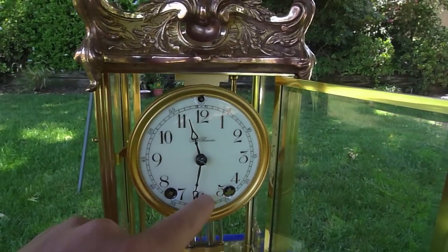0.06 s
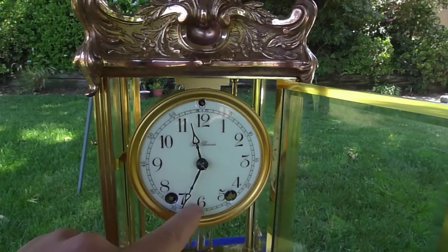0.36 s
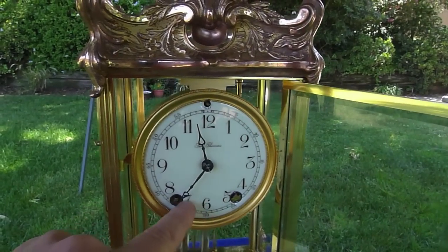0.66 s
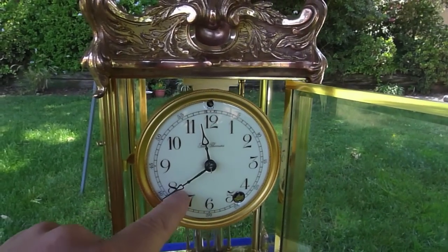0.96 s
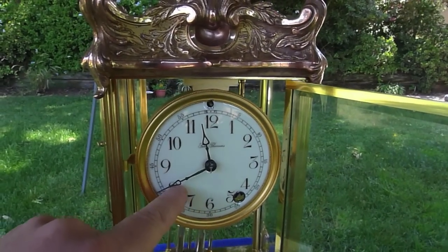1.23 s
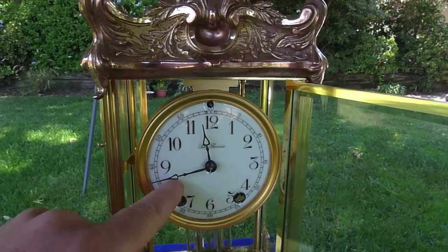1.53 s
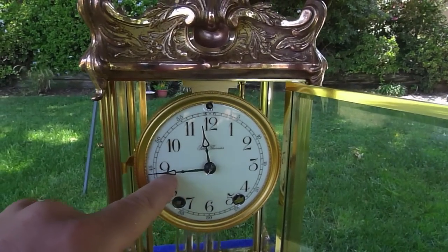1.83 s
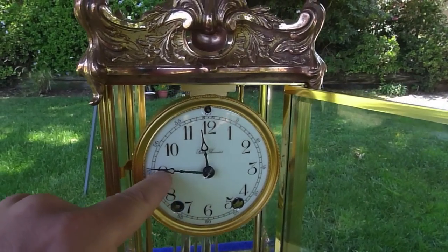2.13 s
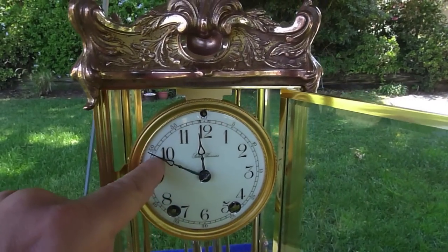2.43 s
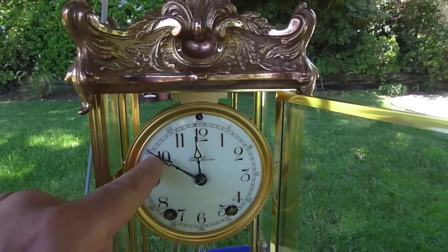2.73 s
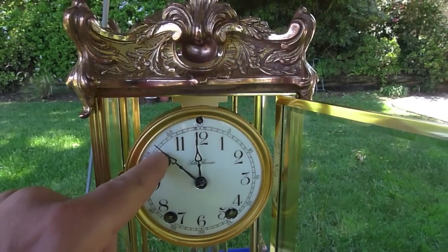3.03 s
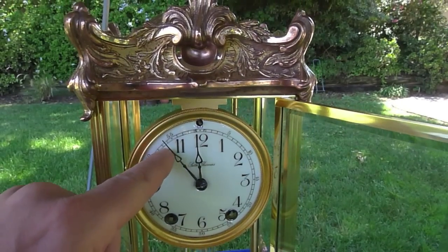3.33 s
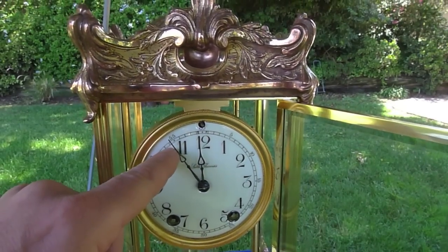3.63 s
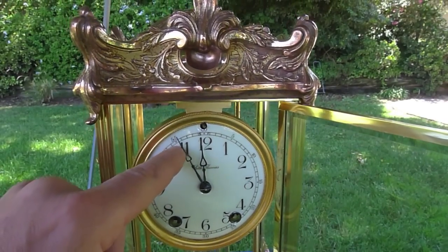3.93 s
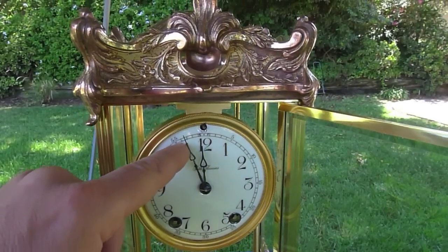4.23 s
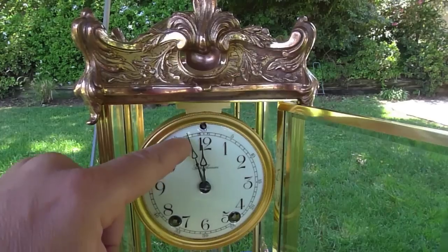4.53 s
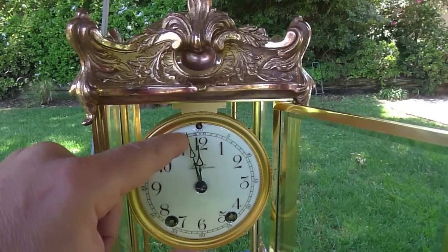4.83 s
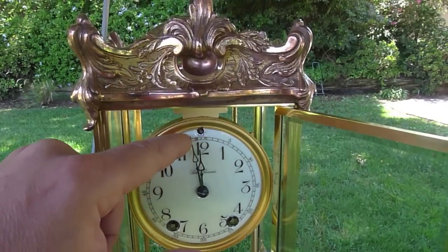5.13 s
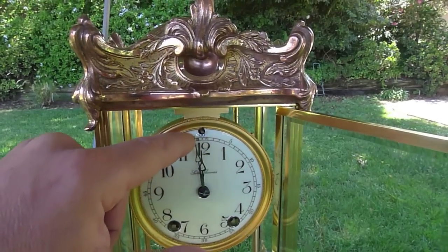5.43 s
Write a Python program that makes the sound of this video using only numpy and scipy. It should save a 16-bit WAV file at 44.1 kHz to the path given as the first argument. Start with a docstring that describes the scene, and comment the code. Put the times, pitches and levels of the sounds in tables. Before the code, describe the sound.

A brass mantel clock ticks close by throughout, a little under three beats a second, crisp ticks alternating with softer tocks and slowly growing duller. Behind it lies a soft, steady garden wash of distant traffic and leaves, swelling slightly near 1.7 seconds, dotted with faint, quick pips. At about 0.7 seconds there is a tiny click, then the minute hand pings lightly under a finger. At 2.7 seconds the strike mechanism releases with a click, whirrs very briefly and is caught with another click at 2.8. At 3.1 seconds a lever snaps down, by far the loudest sound, and the brass plates ring briefly. The ticking continues until the end, around 5.5 seconds. Small birds call quietly: very faint high peeps near 0.6 and 3.2 seconds, a chip at 1.6, single chirps at 2.4 and 3.9, and three thin notes around 4.2.

```python
"""A brass mantel clock ticks in a garden: each impact of its escapement excites damped metal modes.
A finger pushes the minute hand toward the hour, and the hand pings once. The strike train is let go,
whirrs for a moment and is caught; then a lever snaps down loudly and the brass plates ring.
Behind it are a broadband wash of far traffic and foliage, soft low pips, and a few small birds
whose whistles are scattered by leaves and walls."""
import sys
import numpy as np
from scipy import signal
from scipy.fft import rfft, irfft
from scipy.io import wavfile

SR = 44100
rng = np.random.default_rng(int(sys.argv[2]) if len(sys.argv) > 2 else 0)


def digitize_waveform(pressure):
    """Quantize a signal to 16-bit integers and store it at the path in sys.argv[1].

    Rows of a 2-D input are taken as channels; values are limited to [-1, 1].
    """
    field = np.atleast_2d(pressure).T
    bounded = np.clip(field, -1, 1)
    quanta = np.round(bounded * 32767).astype(np.int16)
    wavfile.write(sys.argv[1], SR, quanta)


N = 245637


def amp(db):
    """Amplitude ratio of a level in decibels."""
    return 10 ** (np.asarray(db) / 20)


def unit_rms(x):
    """Normalisation to rms 1."""
    return x / np.sqrt(np.mean(x ** 2) + 1e-20)


def add(mix, start_s, sound):
    """Superposition: a sound joins the mix at its start time."""
    part = mix[max(round(start_s * SR), 0):][:len(sound)]
    part += sound[:len(part)]


def colour(x, spectrum):
    """Linear filtering by (f/Hz, gain/dB) points, interpolated in log frequency."""
    f, db = np.transpose(spectrum)
    hz = np.fft.rfftfreq(x.shape[-1], 1 / SR)
    gain = amp(np.interp(np.log(hz + 1), np.log(f), db))
    return irfft(rfft(x) * gain, x.shape[-1])


def noise(spectrum, size):
    """Spectral shaping of white noise, at rms 1."""
    return unit_rms(colour(rng.standard_normal(size), spectrum))


def decay(t, t60):
    """Exponential damping: 60 dB in t60 seconds."""
    return np.exp(-np.log(1000) * t / t60)


def ring(modes, t):
    """Free vibration: a sum of damped modes in random phase."""
    return sum(amp(db) * decay(t, t60) * np.sin(2 * np.pi * (hz * t + rng.random()))
               for hz, db, t60 in modes)


def impact(modes, spectrum, rattle_share, rattle_t60, rise_s):
    """Impact excitation: distinct modes plus a dense, noisy rattle; rms 1 over the first 10 ms."""
    t = np.arange(SR // 3) / SR
    head = SR // 100
    clear = ring(modes, t)
    rattle = noise(spectrum, len(t)) * decay(t, rattle_t60)
    sound = np.sqrt(1 - rattle_share) * clear / clear[:head].std()
    sound += np.sqrt(rattle_share) * rattle / rattle[:head].std()
    sound *= 1 - np.exp(-t / rise_s)
    return sound / sound[:head].std()


# Spectrum of the outdoor noise: f/Hz, relative level/dB
WASH_SPECTRUM = [(15, -69.5), (25, -49), (49, -37.5), (105, -21), (158, -14.5), (186, -13.5), (237, -10.5),
                 (431, -6), (497, -6.5), (995, -7.5), (1120, -7.5), (1260, -9), (5310, -18), (6580, -23.5),
                 (7600, -39.5), (9880, -67), (16700, -120)]


def wash(level_db=-54, swell_db=3.5, swell_at_s=1.66, swell_width_s=0.39):
    """Incoherent sources, far traffic and foliage, sum to steady noise; its low band swells once."""
    air = amp(level_db) * noise(WASH_SPECTRUM, N)
    low = signal.sosfiltfilt(signal.butter(1, (300, 400), "band", fs=SR, output="sos"), air)
    swell = np.exp(-((np.arange(N) / SR - swell_at_s) / swell_width_s) ** 2)
    return air + low * (amp(swell_db * swell) - 1)


# Ticks and tocks in turn, uneven from tooth to tooth: t/s, relative level/dB
BEATS = [(0.0892, -41), (0.4767, -44.5), (0.826, -39), (1.2004, -42), (1.5609, -39.5), (1.9364, -41.5),
         (2.307, -39.5), (2.679, -44.5), (3.046, -37.5), (3.4166, -44), (3.7854, -38.5), (4.166, -46.5),
         (4.5305, -38.5), (4.897, -42), (5.2677, -38.5)]
# Modes of the escapement: f/Hz, tick level/dB, tock level/dB, T60/s
ESCAPEMENT_MODES = [(1350, -21, -12, 0.058), (2025, -2, -25, 0.13), (2418, -5, -13, 0.071),
                    (3080, -5.5, -6, 0.02), (3337, -6, -1.5, 0.063), (3494, 1, 1, 0.065),
                    (4140, -3.5, -3.5, .06), (4600, -11, -10, 0.12), (5330, -11.5, -11, 0.099),
                    (5930, -6.5, -5, 0.093), (5840, -17, -5, 0.088), (6310, -0.5, -4, 0.068),
                    (6530, -7, -10.5, 0.041)]
# Spectrum of a beat's rattle: f/Hz, level/dB
BEAT_RATTLE = [(600, -24.5), (1200, 1), (2000, -3.5), (3200, 4.5), (4500, -3), (6300, 2.5), (7200, -17)]


def escapement():
    """Modal ringing: teeth drop on two pallets in turn, a crisp tick and a softer tock, no two alike."""
    out = np.zeros(N)
    for k, (s, db) in enumerate(BEATS):
        is_tock = k % 2
        tilt = 5 - 1.5 * s  # dB/octave: the beats start bright and slowly grow duller
        modes = []
        for hz, tick_db, tock_db, t60 in ESCAPEMENT_MODES:
            level = (tock_db if is_tock else tick_db) + tilt * np.log2(hz / 3000)
            modes.append((hz, level + 0.73 * rng.standard_normal(), t60))
        if is_tock:
            beat = amp(-6.5) * impact(modes, BEAT_RATTLE, 0.25, rattle_t60=0.11, rise_s=0.0012)
        else:
            beat = amp(-7.5) * impact(modes, BEAT_RATTLE, 0.4, rattle_t60=0.098, rise_s=0.00046)
        add(out, s - 0.0005, amp(db) * beat)
    return out


# The clearest pips from the garden: t/s, relative level/dB
CLEAR_PIPS = [(0.1922, -50), (0.2485, -50), (0.8344, -50), (1.4017, -52), (1.7327, -52), (1.932, -50.5),
              (2.3967, -52), (2.8898, -49.5), (3.4903, -46.5), (3.6532, -47.5), (3.714, -49),
              (3.843, -49.5), (4.1046, -49), (4.2856, -47.5), (4.3894, -51), (4.8996, -49), (5.1826, -46.5),
              (5.448, -52)]


def pips(pitch_hz=1135.5, rise_s=0.007, width_s=0.0082, gap_s=0.075, growth_db_per_s=0.86):
    """Gaussian tone pulses near one pitch: a few clear ones in a faint, uneven, slowly growing chatter."""
    out = np.zeros(N)
    t = np.arange(-SR // 50, SR // 50) / SR
    clear = [(s + rise_s, db) for s, db in CLEAR_PIPS]
    jitter, spread = rng.standard_normal(size=(120, 2)).T
    times = gap_s * (np.arange(len(jitter)) + 0.3 * jitter)
    levels = -58.5 + growth_db_per_s * times + 3.5 * np.minimum(spread, 1.5)
    faint = [(s, db) for s, db in zip(times, levels)
             if all(abs(s - clear_s) > t[-1] for clear_s, _ in clear)]
    envelope = np.exp(-(t / width_s) ** 2)
    for s, db in clear + faint:
        hz = pitch_hz * (1 + 0.015 * rng.standard_normal())
        add(out, s + t[0], amp(db - 0.5) * envelope * np.sin(2 * np.pi * hz * t))
    return out


def progress(length_s):
    """Normalised time, 0 to 1 over a note."""
    return np.linspace(0, 1, round(length_s * SR))


def whistle(hz, db, hoarse=0, harmonics=((1, 0),), flutter_hz=540):
    """Amplitude modulation: random flutter spreads a bird's pure tone into a hoarse band."""
    lowpass = signal.butter(3, flutter_hz, fs=SR, output="sos")
    flutter = unit_rms(signal.sosfilt(lowpass, rng.standard_normal(len(hz))))
    cycles = np.cumsum(hz) / SR
    tone = sum(amp(level) * np.sin(2 * np.pi * k * cycles) for k, level in harmonics)
    voice = tone * (np.sqrt(1 - hoarse) + np.sqrt(hoarse) * flutter)
    return amp(db) * voice * signal.windows.tukey(len(hz), 0.15)


# Runs of very high peeps: t/s, level/dB
PEEP_RUNS = [(0.618, -72), (3.186, -73.5)]


def peeps(from_hz=6720, to_hz=7300, length_s=0.028, period_s=0.068):
    """Linear frequency sweeps: a bird's rising peeps, three to a run."""
    out = np.zeros(N)
    hz = from_hz + (to_hz - from_hz) * progress(length_s)
    for s, db in PEEP_RUNS:
        for k in range(3):
            add(out, s + k * period_s, whistle(hz, db))
    return out


# Blows in the strike work: t/s, relative level/dB, tilt/(dB/octave), rattle share of the power
BLOWS = [(0.689, -50, 17, 0.9), (2.676, -41, 6, 0.9), (2.6875, -30.5, -4, 0.57), (2.8117, -46, 13, 0.7),
         (2.8272, -31.5, -1.5, 0.87), (3.0775, -17, 1, 0.31), (3.091, -29.5, -1, 0.8)]
# Modes of the brass plates and levers: f/Hz, level/dB, T60/s
PLATE_MODES = [(707, -17.5, 0.24), (1240, -13, 0.13), (1297, -10, 0.17), (1450, -16.5, .18),
               (1618, -11.5, 0.23), (1900, 3, 0.029), (2010, -4, 0.16), (2094, 9, 0.069), (2503, 1, 0.08),
               (2770, -11, 0.15), (3122, -12.5, 0.17), (3300, -9, .11), (3530, -10, 0.2), (3380, -4, 0.073),
               (3920, -2, .1), (3840, -6, .1), (4030, -9, 0.19), (4140, -1.5, 0.11), (4345, -11.5, .11),
               (4870, -4, 0.12), (4990, -8.5, 0.15), (5300, -10.5, .11), (5720, -16, 0.13),
               (5670, -16.5, 0.088), (5750, -11, 0.13), (6300, -11, .07), (6720, -13.5, 0.11),
               (7200, -17, .08)]
# Spectrum of a blow's rattle: f/Hz, level/dB
BLOW_RATTLE = [(180, -65), (300, -32.5), (1240, -13.5), (1480, -11.5), (2100, -11), (2340, -12),
               (2950, -3.5), (3970, -1.5), (4610, -11.5), (4930, -4.5), (5420, -15), (6370, -8),
               (7600, -32), (9880, -74.5), (16700, -120)]


def strike_work():
    """Plate vibration: levers and pins hit the brass; light contacts are brighter."""
    out = np.zeros(N)
    for s, db, tilt, rattle_share in BLOWS:
        modes = [(hz, level + tilt * np.log2(hz / 3000), t60) for hz, level, t60 in PLATE_MODES]
        spectrum = [(hz, level + tilt * np.log2(hz / 3000)) for hz, level in BLOW_RATTLE]
        blow = impact(modes, spectrum, rattle_share, rattle_t60=0.049, rise_s=0.00018)
        add(out, s, amp(db - 8.5) * blow)
    return out


# Modes of the thin minute hand: f/Hz, level/dB, T60/s
HAND_MODES = [(5840, -44.5, 0.081), (6340, -49, .06), (7300, -63, .04)]


def minute_hand():
    """Free vibration: the hand pings once under the finger."""
    return ring(HAND_MODES, np.arange(SR // 5) / SR)


# Partials of a near bird's chip: harmonic number, level/dB
CHIP_HARMONICS = [(1, -11), (2, 1), (3, -15)]


def chip(start_hz=2127, glide=0.07, length_s=0.033):
    """A harmonic series on a rising fundamental: one bird's chip, loudest in its middle."""
    u = progress(length_s)
    db = -44.5 - 16 * (2 * u - 1) ** 2
    return whistle(start_hz * (1 + glide * u), db, harmonics=CHIP_HARMONICS)


# Arched chirps from the hedge: t/s, duration/s, top f/Hz, level/dB
CHIRPS = [(2.36, .078, 3836, -46), (3.889, .071, 3977, -43.5)]


def chirps(top_at=0.62):
    """Frequency and amplitude modulation: pitch and level climb, then drop as the note turns hoarse."""
    out = np.zeros(N)
    for s, length_s, top_hz, top_db in CHIRPS:
        u = progress(length_s)
        before = np.maximum(1 - u / top_at, 0)
        after = np.maximum(u - top_at, 0) / (1 - top_at)
        hz = top_hz * (1 - 0.17 * before ** 1.4 - 0.26 * after ** 2)
        db = top_db - 11.5 * before ** 2 - 2.5 * after ** 2
        add(out, s, whistle(hz, db, hoarse=u ** 1.3))
    return out


def strike_train(free_s=0.154, start_hz=76, gain_hz_per_s=400, db_per_octave=4):
    """Gear noise pulses at the tooth rate: the freed wheels whirr faster and louder until caught."""
    t = np.arange(0, free_s, 1 / SR)
    tooth_hz = start_hz + gain_hz_per_s * t
    teeth = np.cumsum(tooth_hz) / SR
    tooth_db = 2.2 * rng.standard_normal(int(teeth[-1]) + 1)[teeth.astype(int)]
    contact = 0.25 + np.exp(-(teeth % 1) / 0.32)
    rasp = rng.standard_normal(len(t)) * amp(tooth_db) * contact
    gain = amp(-55.5 + db_per_octave * np.log2(tooth_hz / start_hz))
    return gain * wheel_resonance(rasp) * signal.windows.tukey(len(t), 0.1)


# Response of the train's wheels: f/Hz, level/dB
TRAIN_SPECTRUM = [(200, -55), (1500, -7), (3500, -7), (4800, -2.5), (5400, -4), (6200, 4), (7000, -14),
                  (7700, -13)]


def wheel_resonance(rasp):
    """Source and filter: the wheels colour the rasp of their teeth; rms 1."""
    return unit_rms(colour(rasp, TRAIN_SPECTRUM))


# Thin notes of another bird: t/s, level/dB
THIN_NOTES = [(4.18, -59), (4.226, -58), (4.256, -53.5)]


def thin_notes(pitch_hz=5045, length_s=0.023):
    """Narrow-band tone bursts: three slightly hoarse whistles of constant pitch."""
    out = np.zeros(N)
    for s, db in THIN_NOTES:
        add(out, s, whistle(np.full(round(length_s * SR), pitch_hz), db, hoarse=0.12))
    return out


def garden(x, t60):
    """Reverberation: leaves and walls scatter a call into a short tail."""
    t = np.arange(SR // 2) / SR
    tail = rng.standard_normal(len(t)) * decay(t, t60) * (1 - np.exp(-t / 0.002))
    return signal.fftconvolve(x, tail / np.linalg.norm(tail))[:N]


def scene():
    """Superposition of the close clock and the garden; far birds are more reverberant than near ones."""
    clock = escapement() + strike_work()
    add(clock, 2.675, strike_train())
    add(clock, 0.775, minute_hand())
    radiation = signal.butter(2, 220, "high", fs=SR, output="sos")  # small parts radiate no bass
    mix = signal.sosfilt(radiation, clock) + pips()
    far, near = chirps(), thin_notes()
    add(near, 1.585, chip())
    near += peeps()
    mix += amp(-2.5) * far + amp(-2) * garden(far, t60=0.53)
    mix += near + amp(-10) * garden(near, t60=0.4)
    return (mix + wash())[None]


def record(dry, cutoff_hz=7700):
    """Band limiting: deep bass and top treble roll off, and a steep low-pass ends the spectrum."""
    soft = colour(dry, [(20, -7.5), (60, -0.5), (6500, -1), (7000, 1.0), (7400, -8.0), (7800, -11.5)])
    lowpass = signal.firwin(301, cutoff_hz, window=("kaiser", 8), fs=SR)
    return signal.oaconvolve(soft, lowpass[None], "same")


dry = scene()
out = record(dry)
digitize_waveform(out)
```